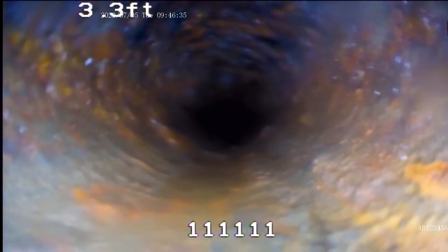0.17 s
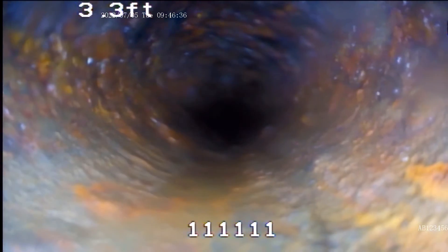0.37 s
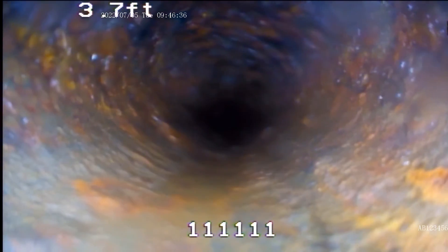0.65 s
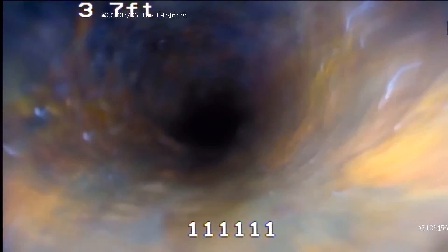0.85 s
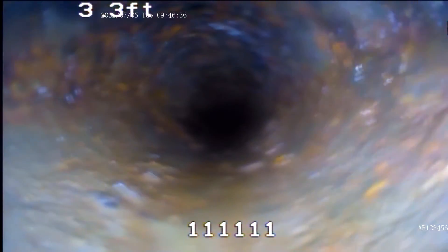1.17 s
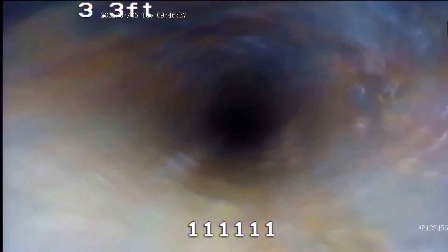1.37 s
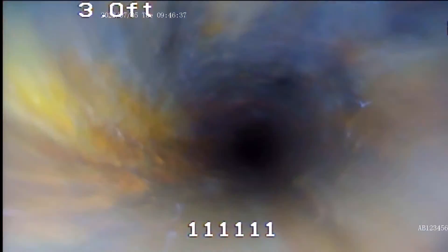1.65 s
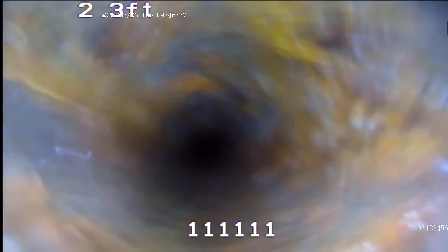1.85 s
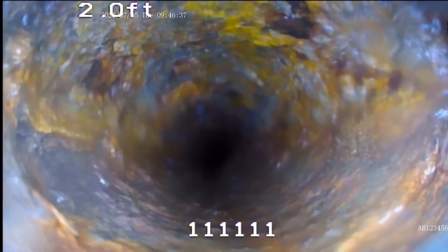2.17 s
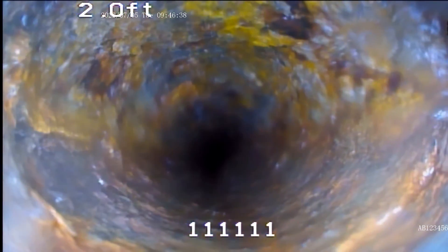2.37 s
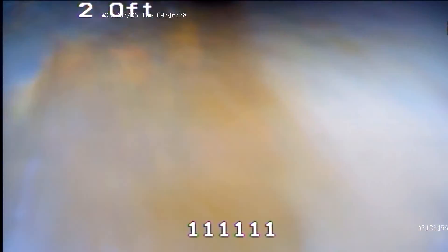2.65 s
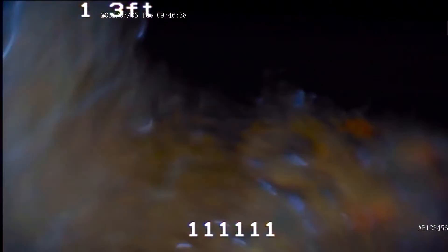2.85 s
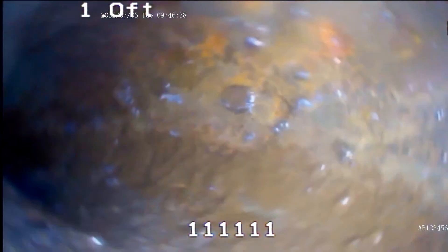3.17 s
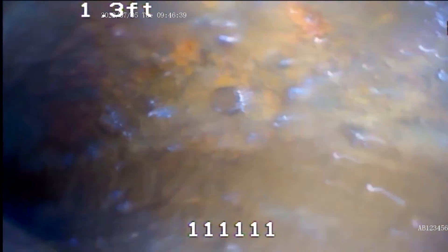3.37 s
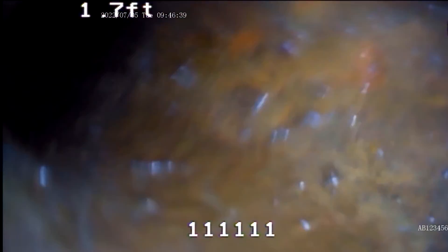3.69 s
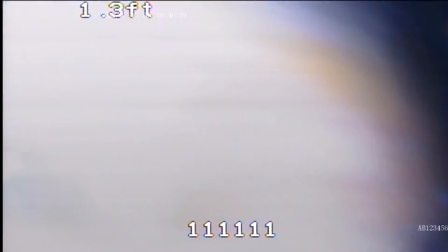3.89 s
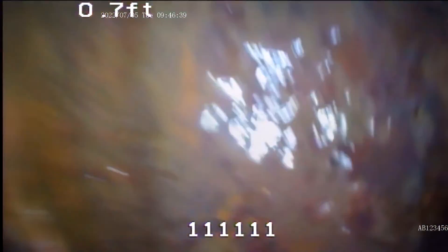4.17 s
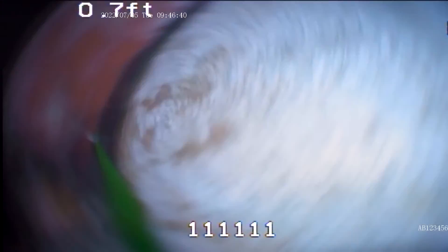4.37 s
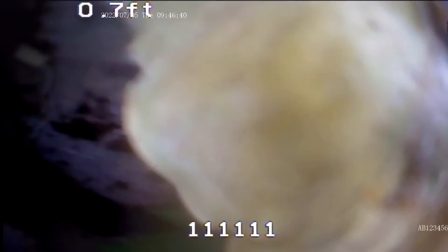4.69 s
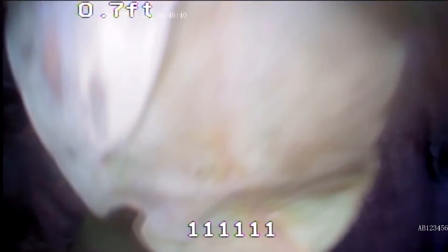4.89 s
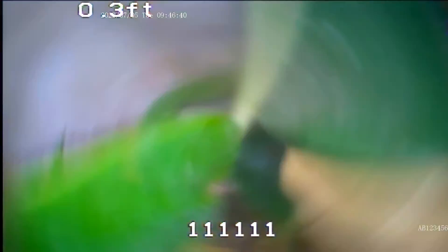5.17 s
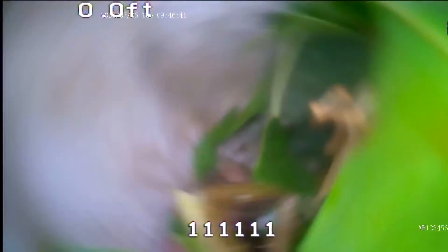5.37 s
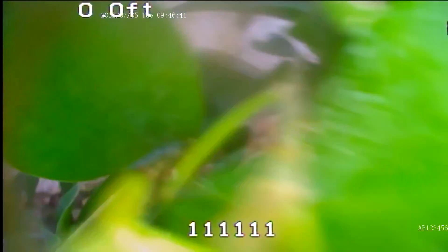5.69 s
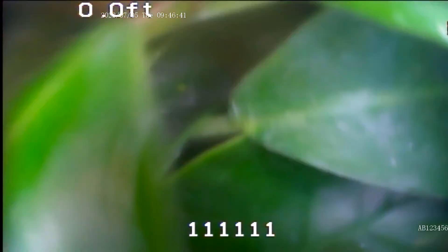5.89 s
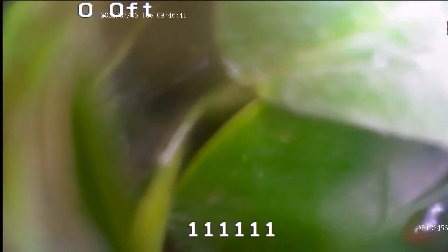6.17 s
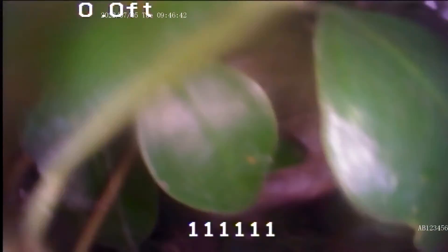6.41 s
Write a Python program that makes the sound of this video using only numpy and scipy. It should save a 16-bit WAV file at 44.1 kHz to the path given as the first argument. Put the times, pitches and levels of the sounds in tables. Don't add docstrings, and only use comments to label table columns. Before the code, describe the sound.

Low, boxy rubbing and gritty scraping strokes of a hauled cable, broken by hard clacks, thinning to near quiet with faint hum and hiss.

```python
import sys
import numpy as np
from scipy import signal
from scipy.fft import rfft, irfft, next_fast_len
from scipy.io import wavfile
from scipy.ndimage import uniform_filter1d

SR = 44100
rng = np.random.default_rng(int(sys.argv[2]) if len(sys.argv) > 2 else 0)


def invert_db(x):
    u = np.asarray(x, float) / 20
    return 10 ** u


def inscribe(sig):
    pcm = np.round(np.clip(np.atleast_2d(sig).T, -1, 1) * 32767)
    wavfile.write(sys.argv[1], SR, pcm.astype(np.int16))


N = 288414

SIZE = next_fast_len(N + 16384)
HZ = np.fft.rfftfreq(SIZE, 1 / SR)
LEAD_S = 0.002
DROPOUT = 52976, 58096
# [f/Hz, level/dB]
SHELL_BED = [(610, -35), (850, -17), (1500, -17), (2500, -26.5), (3600, -36.5), (4300, -35), (7000, -45.5),
             (10000, -59.5), (16000, -66)]


def evened(x):
    return x / np.sqrt(np.mean(np.abs(x) ** 2) + 1e-20)


def read(points):
    f, db = np.transpose(points)
    return invert_db(np.interp(np.log(HZ + 1), np.log(f), db))


def modes(table):
    response = 0
    for k, (f, width, db) in enumerate(table):
        resonance = 1j * HZ * width / (f ** 2 - HZ ** 2 + 1j * HZ * width)
        response = response + (-1) ** k * invert_db(db) * resonance
    return response


def ring(force, body):
    return irfft(rfft(force, SIZE) * evened(body), SIZE)[:N]


def ring_one_part(force, hz, sharpness):
    b, a = signal.iirpeak(hz, sharpness, SR)
    for _ in range(3):
        force = signal.lfilter(b, a, force)
    return evened(force)


def soft_contact(corner_hz):
    return 1 / (1 + 1j * HZ / corner_hz) ** 3


def blow(t, rise, fall):
    return (1 - np.exp(-(t / rise) ** 2)) * np.exp(-t / fall) * np.exp(rise / fall)


def below_peak_db(lag, rise, fall):
    distance = np.maximum(-lag / np.maximum(rise, 0.01), lag / np.maximum(fall, 0.01))
    return 20 * distance ** 1.195


def effort(s, rise, fall, db, rest_db, early=0):
    t = np.arange(0, N / SR + 0.01, 0.002)
    lag = t[:, None] + early - s
    pushes = invert_db(db - below_peak_db(lag, rise, fall))
    total = np.sqrt((pushes ** 2).sum(1) + invert_db(rest_db) ** 2)
    return np.interp(np.arange(N) / SR, t, total)


def slips(per_s, spread_db, lump_db, lump_s):
    size = invert_db(spread_db * np.minimum(rng.exponential(1, N), 4)) * rng.choice([-1., 1.], N)
    clicks = size * (rng.random(N) < per_s / SR)
    width = max(int(lump_s * SR), 1)
    lumps = uniform_filter1d(uniform_filter1d(rng.standard_normal(N), width), width)
    return evened(clicks * invert_db(lump_db * evened(lumps)))


def panels():
    # [f/Hz, width/Hz, level/dB]
    panel_modes = [(231, 23, -0.5), (286.5, 32.2, 0.5), (324.6, 28.4, 2), (352.3, 25.2, 0), (427.6, 20, 1),
                   (471.5, 18.2, 0.5), (540, 38, -2), (677, 24, -19)]
    return modes(panel_modes) * soft_contact(1100)


def rubbing():
    # [f/Hz, width/Hz, level/dB]
    frame_modes = [(83.4, 21.8, -5.5), (98.4, 18.2, -1), (113.1, 11.6, -2.5)]
    drum_modes = [(146, 22.5, -8), (174.8, 19.6, 0), (198.1, 22, -7.5)]
    # [peak t/s, spread/s per 20 dB, frame level/dB, drum rel. level/dB]
    heaves = [(.0, 0.01, -41, 24.5), (.15, 0.2, -50, 15), (.23, 0.1, -36, 4), (.33, .2, -32.5, -15),
              (.41, 0.1, -43, 7), (.5, 0.2, -38.5, 7.5), (.61, 0.24, -36, -4.5),
              (.73, 0.12, -45, 9.5), (.97, 0.35, -34.5, -3.5), (1.15, 0.14, -34, 0.5),
              (1.26, 0.17, -27.5, -11.5), (1.326, 0, -28.5, 4), (1.41, 0.07, -41.5, 5.5),
              (1.62, 0.23, -33.5, -8), (1.71, 0.17, -44, 11), (1.85, 0.14, -53, 20.5),
              (2.1, 0.5, -53, 7), (2.44, 0.16, -43, 1.5), (2.6, 0.27, -44, -5),
              (2.84, 0.085, -33, -1), (2.94, 0.27, -37.5, 2.5), (3.05, 0.091, -37.5, -6),
                      (3.21, 0.092, -44.5, -5), (3.42, 0.13, -35.5, -0.5), (3.54, 0.11, -42, -3),
                      (3.78, 0.22, -49, 3), (3.96, 0.14, -34.5, -7), (4.035, .1, -41.5, 1.5),
                      (4.13, .4, -42, -2), (4.41, .2, -40, -4), (4.49, .15, -38, -4),
                      (4.6, 0.27, -51.5, 2.5), (4.795, .04, -42, -15), (5.05, 0.29, -49, -7.5),
                      (5.27, 0.23, -36.5, -1), (5.42, 0.46, -33.5, -1), (5.545, 0.12, -33, 1),
                      (5.71, 0.18, -35, -2.5), (5.8, 0.13, -30, -8.5), (5.919, .15, -46, -7.5),
                      (6.189, 0.12, -54, -11.5)]
    # [peak t/s, rise/s per 20 dB, fall/s per 20 dB, rub level/dB,
    # scrape rel. level/dB]
    drags = [(0.059, 0.5, 0.25, -40, 4), (.2, 2.3, 0, -40.5, -17.5), (.35, -0.1, 1, -48, -11),
             (.49, 0.28, 0.24, -35, -7.5), (.72, -0.03, .5, -36, -15), (.93, 0.2, 0.96, -45, -17.5),
             (1.15, 0.46, 0.47, -43.5, -7.5), (1.319, -0.54, 0.2, -40, -11.5),
             (1.42, 0, -0.06, -43, -22), (1.53, 0.4, 0.75, -50, -3), (1.71, 0.1, 0.17, -37, -12.5),
             (1.832, 0.28, 0.11, -36.5, -1.5), (2.06, 1.5, 0.5, -54, -4),
             (2.441, 0.1, 0.09, -39.5, -8),
             (2.771, 0.23, 0.44, -46.5, -5.5), (2.85, .15, 0.22, -39, -1.5),
                     (2.939, 0.36, 0.16, -41, -4), (3.199, 0.38, 0.19, -51.5, -18),
                     (3.408, 0.11, 0.14, -36, -6.5), (3.53, 0.25, 0.18, -49.5, -4),
                     (3.779, 0.21, 0.98, -47, -7), (3.96, 0.042, 0.28, -38, -4.5),
                     (4.31, 0.41, .3, -44.5, -6.5), (4.49, 0.28, 0.3, -45.5, -10),
                     (4.63, 0.22, 0.27, -47, -17.5), (5.0, 0.15, 0.47, -52.5, -5.5),
                     (5.15, 0.19, 0.75, -42, -17.5), (5.56, 0.82, 0.29, -39, -13.5),
                     (5.7, 0.52, 0.21, -39.5, -13), (5.82, 0.34, 0.14, -43, -14),
                     (6.2, .08, 0.24, -63, -14), (6.545, .06, .1, -58, 4)]
    # [t/s, treble lift/dB]
    grit_lift = [(0, 6), (.2, -4.5), (.42, -10), (.6, -1.5), (.9, -4), (1.15, 0.5), (1.5, -3), (1.9, -2),
                 (2.1, -14), (2.4, -15), (2.6, -18), (2.8, -0.5), (3.3, -12), (3.42, 8.5), (3.6, -3.5),
                 (4.3, -10), (4.54, 9.5), (5.199, 1.5)]
    frame_rest_db, drum_rest_db, rub_rest_db, scrape_rest_db = -71.5, -79, -81, -80
    drum_steep, scrape_steep = 1.096, 1.38
    early_s = 0.014

    s, spread, db, drum_db = np.transpose(heaves)
    frame = effort(s, spread, spread, db, frame_rest_db, early_s)
    drum = effort(s, spread / drum_steep, spread / drum_steep, db + drum_db, drum_rest_db, early_s)
    heave = slips(900, 1.8, 1.1, 0.015)
    mount = HZ / (HZ - 45j)
    low = ring(heave * frame, modes(frame_modes) * soft_contact(400) * mount)
    low += ring(heave * drum * invert_db(-0.5), modes(drum_modes) * soft_contact(520))

    s, rise, fall, db, scrape_db = np.transpose(drags)
    rub = slips(3500, 3.55, 1.5, 0.0086)
    panel = ring(rub * effort(s, rise, fall, db, rub_rest_db), panels())
    scrape = rub * effort(s, rise / scrape_steep, fall / scrape_steep, db + scrape_db, scrape_rest_db)
    grit_db = np.interp(np.arange(N) / SR, *np.transpose(grit_lift))
    return low + panel, scrape, scrape * invert_db(grit_db - 3.0)


def knocks():
    # [t/s, rattle peak/dB, shell note rel. level/dB, panel note rel. level/dB, panel note f/Hz]
    snaps = [
        (2.8271, -20, -1.5, 4.5, 480),
        (3.3857, -34, 4.5, 8.5, 296),
        (3.813, -47.5, -20, -5, 296),
        (3.9235, -21, 3, 4, 506),
        (3.9509, -29, -11, 3, 480),
        (4.104, -44.5, -6, -4, 320),
        (4.353, -22, 4, -5, 510),
        (4.3746, -36, 3, 7, 484),
        (4.3862, -30, -16, 8.5, 440),
    ]
    cracks = [
        (0.7134, -30.5, -12, 0.5, 252),
        (1.6609, -41, -5, 2, 277),
        (2.4191, -23.5, -27, 0.5, 530),
        (2.95, -38, 11.5, 20, 330),
        (4.4437, -32.5, 0, -3, 570),
        (4.555, -50, 4, 18.5, 316),
        (4.919, -58, -11, 15.5, 463),
        (6.525, -50.5, -10, -9, 318),
    ]
    plain_knocks = [(.0837, -32, -19, -1, 456), (.3322, -47.5, -9, 5, 258), (0.5083, -37, -14, -2, 430),
                    (.5643, -48.5, 2, 22.5, 342), (0.6986, -39, -7, 6.5, 231), (1.042, -49, 4, 12.5, 330),
                    (1.1072, -41, 1, 9, 452), (1.3949, -46, 8, 8, 344), (1.4359, -38.5, -14, 5, 393),
                    (1.4653, -33, 3.5, -1.5, 231), (2.3862, -41.5, 3, 8.5, 519),
                    (3.1256, -43, 0.5, 5.5, 234), (3.9141, -34.5, -16, -2, 410), (4.129, -42, -2, -3, 538),
                    (4.2317, -59.5, 8, 19, 328), (4.2892, -40.5, -7, 9, 487),
                    (4.3384, -33.5, -3.5, 9.5, 484), (4.4567, -37, -1, 15, 520),
                    (5.1428, -57.5, 15, 7, 248), (6.1683, -71, 9, 17.5, 257)]
    thuds = [(0.278, -48.5, -10, 11.5, 261), (2.042, -45, 5.5, -3, 231), (2.999, -36.5, 6.5, 12.5, 430),
             (3.331, -37, -15, 6.5, 477), (3.9575, -27.5, 9.5, 4.5, 433), (4.1528, -56.5, -6, 30, 278),
             (4.3249, -38.5, 2, -3, 231), (4.4197, -31.5, -7, 5, 540), (4.9623, -35.5, -6.5, 2, 428),
             (5.004, -46.5, 7, -3, 528), (5.0534, -45, 7, 10, 530), (5.0783, -36.5, 7, 10.5, 526),
             (5.1977, -47, -13, 19, 418), (5.249, -39, 4, 8, 550)]
    rows = []
    for kind, treble_db in (snaps, 6), (cracks, 3.5), (plain_knocks, -5), (thuds, -17):
        rows += [(*row, treble_db) for row in kind]

    span = 3000
    t = np.arange(span) / SR
    plain, hard, soft, notes = np.zeros((4, N + span))
    for s, db, note_db, panel_db, hz, treble_db in rows:
        rattle, rumble = rng.standard_normal((2, span))
        detune, shell_phase, panel_phase = rng.standard_normal(3)
        start = int((s - LEAD_S) * SR)
        here = slice(start, start + span)
        plain[here] += invert_db(db + 1.5) * rattle * blow(t, 0.004, 0.005)
        hard[here] += invert_db(db + 1.5 + treble_db) * rattle * blow(t, 0.0028, 0.0037)
        soft[here] += invert_db(db + panel_db - 6.5) * rumble * blow(t, 0.0032, 0.019)
        shell_note = np.sin(2 * np.pi * 1061 * (1 + 0.01 * detune) * t + 9 * shell_phase)
        panel_note = np.sin(2 * np.pi * hz * t + 9 * panel_phase)
        notes[here] += invert_db(db + note_db) * shell_note * blow(t, 0.004, 0.0096)
        notes[here] += invert_db(db + panel_db + 3.5) * panel_note * blow(t, 0.0041, 0.0047)
    return ring(soft[:N], panels()) + notes[:N], plain[:N], hard[:N]


def bed():
    t60 = 0.025
    t = np.arange(4000) / SR
    tail = rng.standard_normal(4000) * invert_db(-60 * t / t60)
    return invert_db(3.0) * read(SHELL_BED) * rfft(tail / np.linalg.norm(tail), SIZE)


def shell_seen_from(count):
    # [f/Hz, width/Hz, level/dB]
    shell_modes = [(736, 36, -5.5), (1053.7, 24.7, -0.5), (1280, 26, -9.5), (1435, 48, -6),
                   (1563, 170, -17), (1780, 18, -15.5), (1960, 56, -19.5), (2188, 40, -15), (2650, 88, -24),
                   (2795, 43, -19.5), (3164, 110, -22.5), (3520, 180, -27), (4130, 150, -39.5),
                   (4930, 180, -31.5), (5640, 150, -41), (7700, 260, -42)]
    vary_db, shift = 2.5, 0.015
    bodies = []
    for _ in range(count):
        spot = []
        for k, (f, width, db) in enumerate(shell_modes):
            detune, favour = rng.standard_normal(2)
            if k == 1:
                detune = 0
            spot.append((f * (1 + shift * detune), width, db + vary_db * favour))
        bodies.append(modes(spot) + bed())
    return bodies


def shell(plain, hard):
    edge_hz, drift_per_s = 3700, 2.1
    bodies = shell_seen_from(count=5)
    high = 1 / (1 + (edge_hz / np.maximum(HZ, 1)) ** 3)
    turn = np.pi * drift_per_s * np.arange(N) / SR
    spots = np.arange(len(bodies))[:, None] * np.pi / len(bodies)
    near = np.cos(turn + spots) ** 8
    total = 0
    for share, body in zip(near / near.sum(0), bodies):
        force = rfft(plain * share, SIZE) * (1 - high) + rfft(hard * share, SIZE) * high
        total = total + force * evened(body)
    grit_heard_dry = invert_db(-11.0) * ring(hard, read(SHELL_BED))
    return irfft(total, SIZE)[:N] + grit_heard_dry


def scrubbing():
    # [peak t/s, rise/s per 20 dB, fall/s per 20 dB, level/dB, centre f/Hz]
    scrubs = [(.08, 0, 0.13, -41.5, 1350), (.2, 0.8, 0, -51.5, 1390), (.44, .08, 0, -46.5, 1900),
              (.52, 0.1, .12, -46, 1340), (.98, 0.4, -0.5, -63.5, 1480), (1.13, -0.2, 0.3, -54, 1500),
              (1.67, -0.06, 0.06, -51, 2050), (1.75, 0, 0.13, -44, 1510), (1.83, .1, 0.05, -43.5, 1600),
              (1.95, .1, 0, -53.5, 1550), (2.17, 0, .08, -57.5, 1450), (2.3, -0.3, 0.4, -62, 1480),
              (2.68, .1, 0.7, -54.5, 1300), (2.92, 0.16, .06, -50, 1880), (3.02, 0.1, 0, -49, 1600),
              (3.34, -0.03, .08, -49, 1500), (3.45, 0, 0.03, -47.5, 1350), (3.77, -0.04, .06, -55, 1400),
              (3.85, 0, -0.3, -51, 1490), (4.05, .04, 0, -52, 1600), (4.3, -0.23, 0, -48.5, 1400),
              (5.36, 0.5, .15, -59, 1420), (5.57, -0.1, -0.03, -50.5, 1500), (5.66, 0, 0.18, -56.5, 1470),
              (5.86, 0.5, -0.1, -63, 1290), (.45, .07, .2, -73, 8500), (1.14, .1, .1, -71, 9000),
              (1.76, .15, .25, -73, 8500), (3.41, .03, .2, -66, 7500), (3.45, .08, .12, -56, 2900),
              (2.96, .1, .1, -70, 8500), (4.37, .04, .15, -66, 9000), (5.6, .3, .35, -52, 800)]
    grit = slips(2500, 3.2, 2.5, 0.0059)
    out, t = np.zeros(N), np.arange(N) / SR
    for s, rise, fall, db, hz in scrubs:
        here = slice(max(int((s - 0.4) * SR), 0), int((s + 0.4) * SR))
        tone = ring_one_part(grit[here], hz, sharpness=1.7)
        out[here] += tone * invert_db(db - 4.0 - below_peak_db(t[here] - s, rise, fall))
    return out


def rasps():
    # [t/s, peak level/dB, f/Hz]
    catches = [(.035, -41.5, 1990), (0.072, -32.5, 2200), (.4219, -40.5, 1960), (.7128, -28, 2290),
               (1.4636, -32, 1960), (2.417, -25.5, 2080), (2.826, -34, 2190), (3.3842, -30.5, 2190),
               (4.3514, -27, 2150), (4.962, -38, 2220), (4.986, -47.5, 2180), (5.08, -37.5, 2285),
               (.0558, -36, 3500), (0.7115, -41, 3800), (2.4173, -28.5, 3440), (3.1274, -52, 3400),
               (3.4, -42, 3700), (3.4297, -42, 4250), (4.4444, -38.5, 3330), (5.0789, -43, 2880),
               (6.527, -58, 2970), (2.421, -48, 7540), (3.925, -28, 2900), (3.951, -54, 7600),
               (3.925, -32.5, 2180), (3.957, -37, 2200), (2.419, -29, 1480), (0.8, -40, 1470),
               (4.963, -42, 1470), (.281, -52, 1900), (2.93, -44, 2050), (4.09, -48, 2150),
               (4.128, -48, 1700), (4.649, -56, 1080), (3.22, -56, 1050), (2.042, -41, 1960),
               (5.25, -49, 2180), (3.8125, -60, 10500), (1.133, -61, 8800), (2.8265, -48, 10800),
               (2.826, -34, 3500), (4.34, -33, 570), (4.556, -44, 480), (3.0, -35, 720)]
    span, fall_s = 6000, 0.0086
    out, t = np.zeros(N + span), np.arange(span) / SR
    for s, db, hz in catches:
        sharpness = 5.0 if hz < 8000 else 0.9
        tone = ring_one_part(rng.standard_normal(span), hz, sharpness)
        start = int((s - LEAD_S) * SR)
        out[start:start + span] += invert_db(db - 6.0) * tone * blow(t, 0.3 * fall_s, fall_s)
    return out[:N]


def singing():
    # [start t/s, length/s, f/Hz, level/dB, swell/dB]
    sings = [(1.67, 0.13, 175, -33.5, -3.5), (1.81, .12, 178, -38, -2), (1.95, 0.32, 177, -45, -16),
             (2.64, 0.192, 178, -39, 9), (2.83, 0.12, 180, -29, 0), (3.55, 0.0655, 176.5, -38.5, 2),
             (3.71, 0.207, 179, -38, 5), (1.9, 0.14, 765, -57.5, -11), (2.57, .25, 755, -61.5, 6),
             (3.71, 0.2, 750, -59, 3.5), (.49, 0.22, 1075, -48, -12), (.382, 0.055, 175.6, -30, 1),
             (.03, .19, 1290, -44.5, -12), (1.75, 0.132, 1288, -47, .6), (.212, 0.044, 125, -35, 0),
             (.58, .09, 107, -32.5, -4), (.93, .08, 112, -33.5, 0), (1.2, 0.097, 111.5, -33, -3.5),
             (3.42, 0.12, 178, -36, 2), (3.728, .075, 346, -45, .6), (3.412, .085, 1284, -49, .6),
             (3.371, .036, 1066, -44, 3.5), (3.92, 0.081, 745, -41.5, -6), (5.24, 0.22, 114, -34.5, 2.5),
             (5.44, 0.195, 112, -32, 6), (5.7, .14, 99.7, -30.5, -3), (5.27, 0.19, 1060, -57, 0),
             (4.148, 0.052, 240, -41, -8), (2.8, .07, 130, -34.5, -5), (2.0, 0.1, 1290, -63, -4)]
    waver = 0.012
    out = np.zeros(N)
    for s, length, hz, db, swell_db in sings:
        t = np.arange(0, length, 1 / SR)
        width = int(5 * SR / hz)
        grip = uniform_filter1d(rng.standard_normal((2, 20000)), size=width)
        grip = evened(uniform_filter1d(grip, size=width))
        pitch_grip, level_grip = grip[:, :len(t)]
        turns = np.cumsum(hz * (1 + waver * pitch_grip)) / SR
        flutter_db = (-2 - 0.9 * hz / 1000) * level_grip
        swell = swell_db * (t / length - 0.5)
        size = np.sqrt(2) * invert_db(db + swell + flutter_db) * signal.windows.tukey(len(t), 0.4)
        out[int(s * SR):][:len(t)] += size * np.sin(2 * np.pi * turns)
    return out


def edge_pushes():
    n, width_s = np.arange(N), 0.0018
    out = np.zeros(N)
    for at, db in zip(DROPOUT, (-26, -27)):
        out += invert_db(db) * np.exp(-((n - at) / (width_s * SR)) ** 2)
    return out


def idle_air():
    # [f/Hz, width/Hz, level/dB]
    air_modes = [(530, 17, -1.5), (810, 290, -14.5), (1055, 27, -2.5)]
    return invert_db(-72.5) * ring(rng.standard_normal(N), modes(air_modes))


def electronics():
    # [f/Hz, level/dB per Hz]
    hiss = [(12, -29), (20, -2), (49, -25.5), (121, -20.5), (297, -37.5), (521, -22.5), (913, -44),
            (1050, -30.5), (1740, -41.5), (15200, -46.5), (16500, -58.5)]
    # [f/Hz, level/dB rms]
    tones = [
        (59.5, -66.5),
        (15626, -94.5),
    ]
    t = np.arange(N) / SR
    out = invert_db(-69.5) * ring(rng.standard_normal(N), read(hiss))
    for hz, db in tones:
        out += np.sqrt(2) * invert_db(db) * np.sin(2 * np.pi * hz * t)
    return out


def scene():
    rub_body, rub_plain, rub_hard = rubbing()
    knock_body, knock_plain, knock_hard = knocks()
    cable = rub_body + knock_body + shell(rub_plain + knock_plain, rub_hard + knock_hard)
    details = scrubbing() + rasps() + singing() + edge_pushes()
    return (cable + details + idle_air() + electronics())[None]


def low_pass(x):
    return signal.sosfilt(signal.butter(12, 16810, fs=SR, output="sos"), x)


def record(dry):
    n = np.arange(N)
    kept = (n < DROPOUT[0]) | (n >= DROPOUT[1])
    limited = irfft(rfft(dry, SIZE) * (HZ < 15850), SIZE)[:, :N]
    offset = 0.0022
    return low_pass((limited + offset) * kept)


dry = scene()
out = record(dry)
inscribe(out)
```